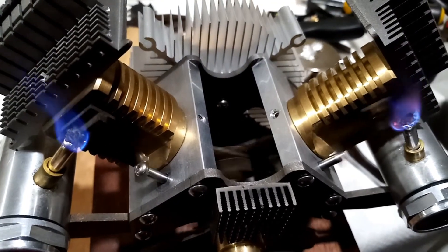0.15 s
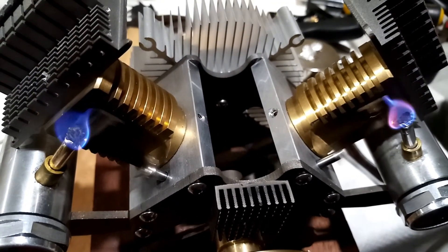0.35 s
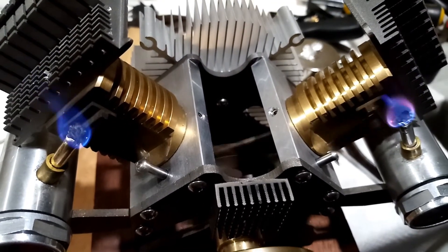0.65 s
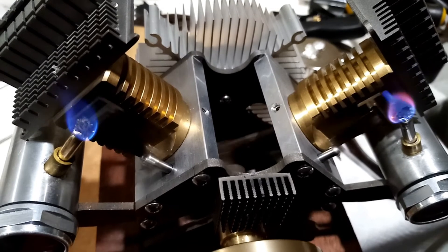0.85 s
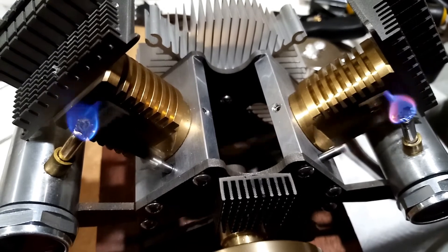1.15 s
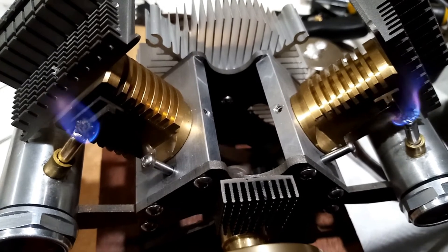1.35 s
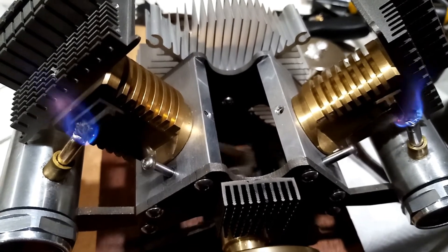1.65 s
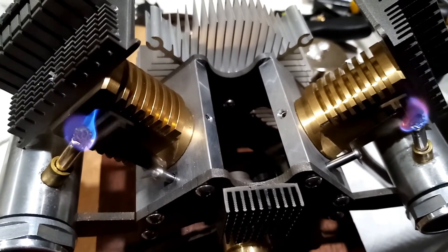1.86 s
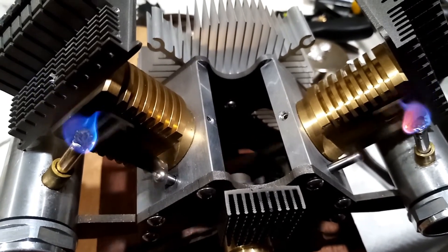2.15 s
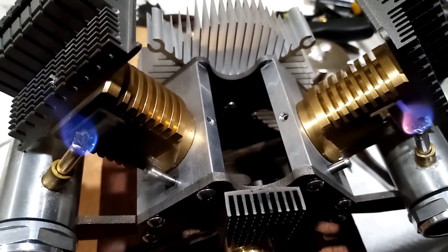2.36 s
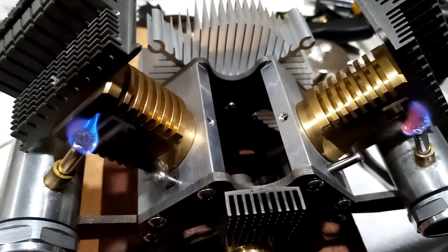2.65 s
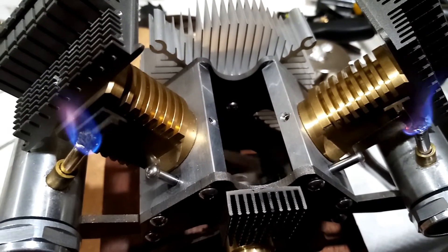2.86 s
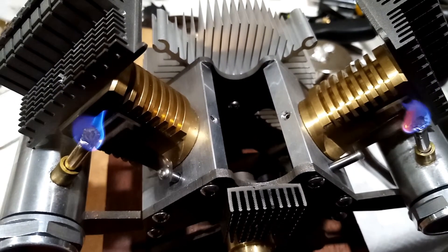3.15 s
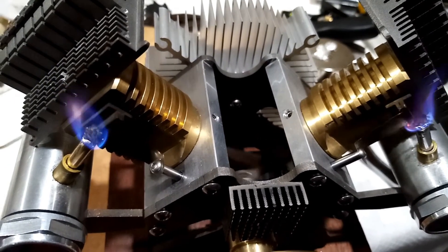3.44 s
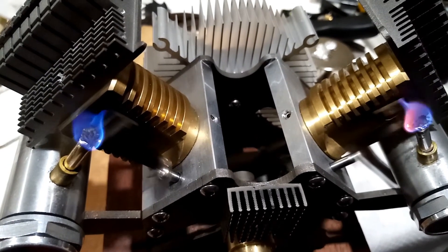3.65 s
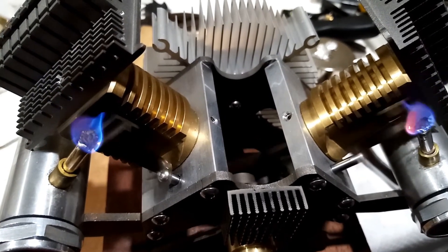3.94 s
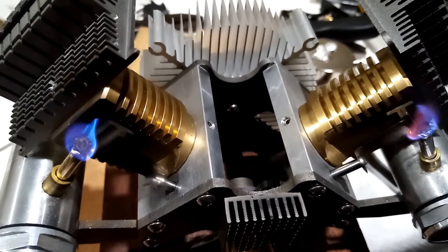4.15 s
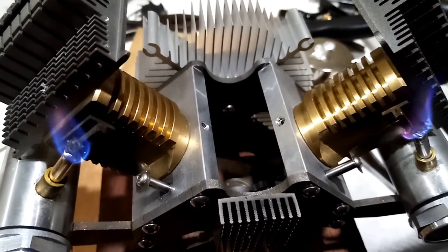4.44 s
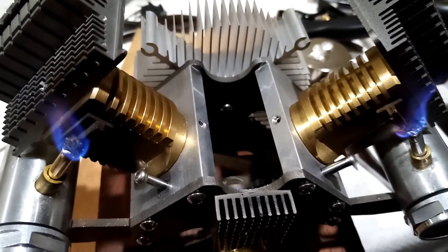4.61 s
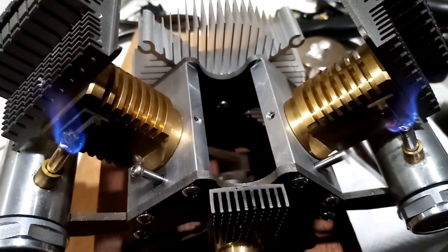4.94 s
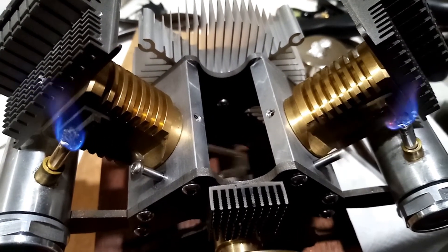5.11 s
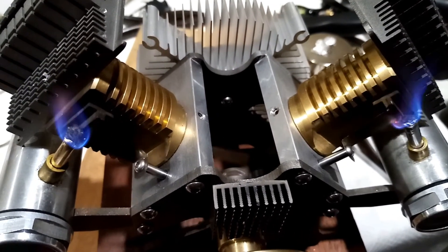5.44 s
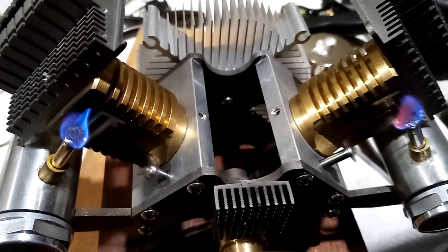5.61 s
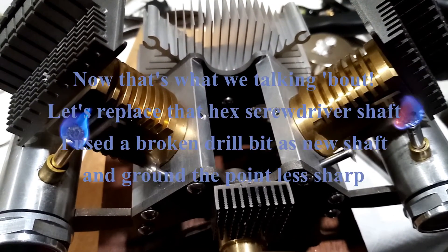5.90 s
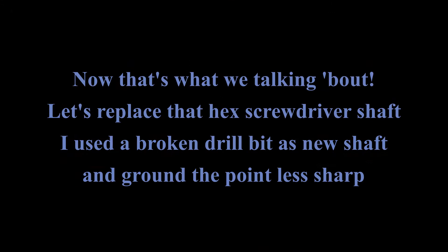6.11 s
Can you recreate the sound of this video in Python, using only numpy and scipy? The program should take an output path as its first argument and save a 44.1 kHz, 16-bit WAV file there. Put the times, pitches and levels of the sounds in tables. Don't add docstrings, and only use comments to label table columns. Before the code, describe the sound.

Close metallic ticking and clacking of a tiny flame-driven engine, soft popping gulps and steady hiss, ending in a sudden stuttered cut to silence.

```python
import sys
import numpy as np
from scipy import signal
from scipy.io import wavfile
from scipy.ndimage import uniform_filter1d

SR = 44100
rng = np.random.default_rng(int(sys.argv[2]) if len(sys.argv) > 2 else 0)


def generate_wav(sig):
    pcm = np.round(np.clip(np.atleast_2d(sig).T, -1, 1) * 32767).astype(np.int16)
    wavfile.write(sys.argv[1], SR, pcm)


def invert_db(x):
    u = np.asarray(x, float) / 20
    return 10 ** u


N = 276462
T = np.arange(N) / SR
TAPS = 2048
HZ = np.fft.rfftfreq(TAPS, 1 / SR)
PORT_LAG = 43
USUAL_SPEED, TURNS = 6.25, 37


def evened(x):
    return x / np.sqrt(np.mean(x ** 2, axis=-1, keepdims=True) + 1e-20)


def peaks(modes):
    return np.sqrt(sum(invert_db(2 * db) / (1 + (2 * (HZ - hz) / width) ** 2) ** 1.24 for hz, width, db in modes))


def colour(x, gain):
    log_gain = np.log(np.maximum(np.r_[gain, gain[-2:0:-1]], 1e-5))
    taps = np.fft.ifft(np.exp(np.conj(signal.hilbert(log_gain)))).real
    return signal.oaconvolve(x, taps / np.linalg.norm(taps))[:N]


def colour_ports(drive, gains):
    right = np.linalg.norm(gains[1])
    return np.array([colour(x, g) * np.linalg.norm(g) / right for x, g in zip(drive, gains)])


def after(events, shape):
    return signal.oaconvolve(events, shape)[:N]


def spikes(s, db):
    out = np.zeros(N)
    out[np.round(np.clip(s, 0, 6) * SR).astype(int)] = invert_db(db)
    return out


def pair(same, grain_db, per_s):
    grains = invert_db(grain_db * evened(uniform_filter1d(rng.standard_normal(N), int(SR / per_s))))
    a, b = evened(rng.standard_normal((2, N)) * grains)
    return np.array([a, same * np.roll(a, PORT_LAG) + np.sqrt(1 - same ** 2) * b])


def lagged(x):
    return np.array([x, np.roll(x, PORT_LAG)])


def pan(db):
    return invert_db(db * np.array([[.5], [-.5]]))


# (t/s, speed/turns per s)
SPEED = [(0, 6.775), (.13, 6.047), (.75, 6.624), (1.28, 6.581), (1.51, 6.346), (2.1, 6.248), (2.16, 6.034),
         (2.4, 6.195), (3.08, 6.285), (3.28, 6.178), (4.21, 6.388), (4.23, 6.18), (4.45, 6.295),
         (4.84, 6.011), (4.87, 6.168), (5.88, 6.327)]


def crank():
    speed = np.interp(T, *np.transpose(SPEED))
    return speed, -.187 + np.cumsum(speed) / SR


def once_a_turn(share):
    return np.interp(np.arange(TURNS) + share, crank()[1], T)


# (f/Hz, width/Hz, left level/dB, right level/dB)
FRAME = [(626.6, 86, -8.5, -1), (885, 86, -6, -11.5), (1144, 110, -6.5, 2), (1257, 50, 0, 2),
         (1541, 218, -5, 3.5), (1754, 144, 1, 4.5), (2220, 470, -2.5, -8.5)]


def frame(drive, low_db, deep_db):
    lift = invert_db(low_db * (abs(HZ - 1200) < 200) + deep_db * (HZ < 990))
    gains = [peaks([(hz, w, row[c]) for hz, w, *row in FRAME]) * lift for c in range(2)]
    return colour_ports(drive, gains)


# (f/Hz, width/Hz, level/dB)
PLATES = [(4150, 1300, 0.5), (6200, 200, -3.5), (6490, 780, 5), (7550, 900, -9.5)]
# (f/Hz, level/dB)
LEFT_PORT = [(700, -2), (2700, -3), (3300, -4), (5100, -1.5), (6400, -1.5), (7800, -10), (8800, -4),
             (9500, -13), (10200, -11.5), (11400, -15), (12200, -26), (13200, -22), (13900, -27),
             (14900, -12), (15500, -25)]
RIGHT_PORT = [(700, 1), (2500, -4.5), (3300, -0.5), (5100, -2.5), (6400, 0.5), (7300, -1.5), (8800, -1.5),
              (9500, 2), (10200, -19), (11400, -3), (12300, -12.5), (13300, -19.5), (13900, -12.5),
              (14600, 3.5), (15500, 4.5)]


def plates(drive, tilt_db, ring_db):
    ring = np.hypot(1, peaks(PLATES)) * invert_db(tilt_db * np.log2((HZ + 1) / 6000))
    ring = ring / np.hypot(1, (3400 / (HZ + 1)) ** 3)
    ring = ring * invert_db(ring_db / (1 + ((HZ - 4050) / 220) ** 2))
    gains = []
    for port in (LEFT_PORT, RIGHT_PORT):
        hz, db = np.transpose(port)
        gains.append(ring * invert_db(np.interp(np.log(HZ + 1), np.log(hz), db)))
    return colour_ports(drive, gains)


# (share of turn, frame level/dB, hiss level/dB, rumble level/dB)
SLIDE = [(0, -41, -35, -56.5), (.08, -46, -35.5, -51.5), (0.188, -49.5, -41.5, -51.5),
         (.255, -48, -38, -52), (.285, -46, -33.5, -54), (.32, -46, -36.5, -55.5), (.36, -44.5, -34, -56),
         (.41, -45, -36, -51), (.47, -46.5, -35.5, -50), (.52, -45, -36.5, -51), (.57, -47.5, -37.5, -52),
         (.62, -46, -36, -50.5), (.68, -46.5, -37, -47), (0.742, -44.5, -37, -49.5), (.84, -51, -42, -45.5),
         (0.909, -45, -41, -63), (0.942, -40, -35.5, -58), (1.0, -44, -30.5, -41.5)]
# (f/Hz, width/Hz, level/dB)
BENCH = [(122, 47, -4), (165, 67, -14.5), (202.6, 13, 2.5), (283.3, 31, -3), (392, 182, -8.5)]


def slide():
    speed, turns = crank()
    share, *columns = np.transpose(SLIDE)
    frame_db, hiss_db, rumble_db = (np.interp(turns % 1, share, c) for c in columns)
    hiss_db = hiss_db + 2.5 * (speed - USUAL_SPEED)
    rumble_db = rumble_db + 1.5 * (speed - USUAL_SPEED)
    rub = frame(lagged(invert_db(frame_db)) * pair(0.68, 1.3, 120), -0.13, 0.1)
    hiss = plates(lagged(invert_db(hiss_db + 4)) * pair(0.07, 1.5, 200), 0.2, 0.26)
    rumble = [colour(x, peaks(BENCH)) for x in lagged(invert_db(rumble_db)) * pair(0.9, 1.4, 86)]
    return rub + hiss + rumble * invert_db(np.array([[-3.0], [1.5]]))


# (f/Hz, width/Hz, level/dB)
BURNERS = [(2890, 1300, 0), (4580, 380, -3)]


def burners():
    away = (crank()[1] - 0.95 + .5) % 1 - .5
    flare = invert_db(-52 + 7.5 * np.exp(-.5 * (away / .05) ** 2))
    return np.array([colour(x, peaks(BURNERS)) for x in flare * pair(.2, 1.9, 300)])


# (t/s, pop level/dB, cavity ring level/dB, bench thud level/dB)
VACUUM = [(0, -34.5, -44, -43.5), (1.05, -33, -58.5, -39), (1.4, -35.5, -48, -49), (2.75, -35, -48, -38),
          (3.35, -37, -79.5, -43.5), (3.65, -35.5, -55, -41), (3.85, -39, -44, -46),
          (5.05, -37.5, -48.5, -46.5), (5.35, -46, -46, -62), (5.8, -36, -43, -42)]
# (t/s, pop level/dB)
BACK_POPS = [
    (0.4584, -40),
    (0.6117, -39),
    (2.4901, -36),
    (3.7732, -33),
    (4.2465, -43),
    (5.0979, -42),
    (5.3774, -35),
]


def gulps():
    s = once_a_turn(-.069)
    when, pop_db, ring_db, thud_db = np.transpose(VACUUM)
    back_s, back_db = np.transpose(BACK_POPS)
    wobble = rng.standard_normal((len(s), 4))
    pop_wobble_db = 1.2 * wobble[:, 2]
    pop_db = np.interp(s, when, pop_db) + pop_wobble_db
    thud_db = np.interp(s, when, thud_db) + pop_wobble_db
    ring_db = np.interp(s, when, ring_db) + 2.2 * wobble[:, 3]
    gulp = spikes(s, pop_db) + spikes(back_s, back_db)
    knock = spikes(s + .015 + .0002 * wobble[:, 0], -39.5 + 1.5 * wobble[:, 1])

    t = np.arange(0, .08, 1 / SR)
    rebound = .55 * np.exp(-.5 * ((t - .0036) / .0006) ** 2)
    suction = rebound - 1.25 * np.exp(-.5 * ((t - .002) / .00042) ** 2)
    thud = (t > .002) * invert_db(-60 * t / 0.14) * np.sin(2 * np.pi * 120 * (t - .0022))
    back_thud = (t > .002) * invert_db(-60 * t / 0.081) * np.sin(2 * np.pi * 203 * (t - .0022))
    ring = (1 - np.exp(-t / 0.0041)) * invert_db(-60 * t / 0.12) * np.sin(2 * np.pi * 385 * t)

    air = after(gulp + knock, suction) + after(spikes(s, thud_db), thud)
    air = air + after(spikes(back_s, back_db), back_thud)
    air = np.roll(air, -round(.002 * SR))
    cavity = after(spikes(s + .003, ring_db + 5.5), ring)
    return np.array([air + cavity, np.roll(invert_db(0.5) * air + invert_db(6.5) * cavity, PORT_LAG + 10)])


def rattle(hold, t60):
    t = np.arange(0, .07, 1 / SR)
    late = np.maximum(t - hold, 0)
    return np.minimum(t / .0004, 1) * (0.34 * np.exp(-late / 0.0014) + 0.45 * invert_db(-60 * late / t60))


def strike(rows, hold, t60, knock_pan_db, tick_pan_db, tilt_db, low_db, deep_db, ring_db):
    s, knock_db, tick_db = np.transpose(rows)
    shape = rattle(hold, t60)
    knock = lagged(after(spikes(s - .003, knock_db + 1.5), shape)) * pair(0.83, 0.48, 800)
    knock = knock + lagged(spikes(s - .0028, knock_db + 13))
    tick = lagged(after(spikes(s - .0027, tick_db + 4), shape)) * pair(0.35, 0.98, 1200)
    tick = tick + lagged(spikes(s - .0022, tick_db + 2))
    return frame(knock * pan(knock_pan_db), low_db, deep_db) + plates(tick * pan(tick_pan_db), tilt_db, ring_db)


def strike_rows(listed, share, scatter_s, knock_db, tick_db, scatter_db):
    rows = [0, knock_db, tick_db] + rng.standard_normal((TURNS, 3)) * [scatter_s, scatter_db, scatter_db]
    rows[:, 0] += once_a_turn(share)
    rows[abs(rows[:, :1] - np.transpose(listed)[0]).argmin(axis=0)] = listed
    return rows


# (share of turn, scatter/s, frame knock level/dB, valve tick level/dB, scatter/dB)
STRIKE_PLACE = [
    (0.001, 0.00031, -36.5, -32.5, 1.5),
    (.288, 0.0015, -54, -50, 18),
    (.357, .001, -40.5, -29, 0),
    (.567, 0.0012, -38.5, -27.5, 3),
    (.718, .0015, -56, -29.5, -0.5),
]
# (hold/s, rattle t60/s, knock L-R/dB, tick L-R/dB, tick tilt/dB per octave,
# low knock level/dB, deep knock level/dB, 4 kHz ring level/dB)
STRIKE_KIND = [
    (0.0029, 0.077, -0.5, -5.5, -1.5, -4.5, -0.5, 10),
    (0.004, 0.038, 0, 2, 3, -15.5, -7.5, 2.5),
    (0.0023, 0.069, -1.5, -2, 2, 1, -2.5, -6.5),
    (0.002, 0.077, 1, 1.5, 3, 6.5, 4.5, -2.5),
    (0.0004, 0.03, -6, -14, 8, 3, 6, 11.5),
]
# (t/s, frame knock level/dB, valve tick level/dB)
SHUTS = [(.1883, -35, -28.5), (.35, -37, -32.5), (.5091, -31, -33.5), (.6637, -33, -29),
         (1.118, -33.5, -27), (1.4219, -37.5, -28), (1.8966, -34, -28), (2.8631, -33.5, -30.5),
         (3.0236, -36.5, -29.5), (3.1839, -36, -30), (3.3436, -39, -38), (3.9817, -33.5, -36),
         (4.141, -33, -33), (4.299, -32, -34), (4.4587, -33.5, -27.5), (4.783, -35.5, -29),
         (4.9471, -35, -31), (5.1077, -47, -35), (5.2689, -31.5, -30.5), (5.7472, -36, -30.5),
         (0.028, -36.5, -36), (0.8156, -36, -30), (0.9648, -33, -35), (1.2696, -35, -32.5),
         (1.5817, -34, -30), (1.7358, -36, -32.5), (2.0556, -34, -31), (2.2188, -35, -34.5),
         (2.3808, -37, -32), (2.541, -33, -35), (2.7015, -39.5, -35), (3.5064, -36, -34),
         (3.6648, -35, -35), (3.8246, -34, -32), (4.6207, -32, -28.5), (5.4319, -38.5, -32),
         (5.5875, -38, -32.5)]
LIFTS = [(.5526, -51, -36.5), (0.7063, -39, -29), (.8558, -38, -48), (1.0075, -38.5, -32),
         (1.16, -36, -32), (1.3116, -39, -27.5), (1.469, -37, -25), (1.6224, -38, -30.5),
         (2.103, -50, -46), (2.267, -42.5, -26), (2.5905, -37.5, -62), (2.91, -38, -29),
         (3.069, -36, -34), (3.388, -39.5, -37), (3.551, -38, -31), (3.8703, -46, -27),
         (4.029, -35.5, -38), (4.185, -42, -26.5), (4.3453, -31, -26), (4.668, -36, -26),
         (5.634, -39, -26.5), (0.0751, -45, -32), (0.2347, -38, -22), (0.396, -39, -37),
         (1.7822, -41, -31), (1.9408, -46, -31.5), (2.4281, -43, -30), (2.7487, -38, -33),
         (3.2276, -38.5, -26), (3.7119, -39.5, -33), (4.5055, -37, -26), (4.8298, -39, -38),
         (4.9915, -43, -31), (5.1537, -40, -33), (5.3156, -48, -36), (5.4747, -40, -34)]
DROPS = [(.5644, -32.5, -24.5), (.7152, -36, -22.5), (.866, -59.5, -34), (1.0197, -40, -24.5),
         (1.1689, -35, -22.5), (2.1162, -37.5, -25), (2.2767, -38.5, -42), (2.9204, -31, -24.5),
         (3.3978, -50, -56), (3.5615, -44, -39), (3.7222, -36, -50), (3.8813, -34.5, -24.5),
         (4.1985, -39.5, -27), (4.3605, -41.5, -27), (4.5158, -40, -27), (5.004, -36, -28.5),
         (5.1647, -36.5, -39), (5.6495, -38.5, -27.5), (0.0834, -38, -29.5), (0.2444, -38, -30),
         (0.4058, -41, -29.5), (1.3215, -36.5, -23.5), (1.4771, -40.5, -24.5), (1.6343, -45.5, -26),
         (1.7915, -38, -23.5), (1.9523, -39.5, -24), (2.4388, -35, -30), (2.6005, -40, -24),
         (2.759, -34.5, -25.5), (3.079, -40.5, -27.5), (3.2384, -43, -30.5), (4.0375, -40, -22),
         (4.6767, -42, -28), (4.8397, -50, -27), (5.3271, -36.5, -32.5), (5.4872, -42, -29)]
SLACKS = [(0.2776, -41, -26), (.4397, -60, -52), (0.896, -35.5, -39), (1.2, -36.5, -28),
          (1.6656, -34.5, -25), (1.827, -36, -26), (1.9874, -48.5, -32), (2.6314, -36.5, -25),
          (2.7935, -38, -51), (3.4348, -44, -55), (3.756, -62.5, -30), (4.073, -34.5, -25.5),
          (4.2303, -34, -28.5), (4.389, -46.5, -25.5), (4.551, -39.5, -45), (4.876, -58, -42),
          (5.038, -43, -44), (0.1183, -39.5, -25.5), (0.594, -35.5, -26), (0.7454, -39, -25),
          (1.0483, -40, -25.5), (1.3551, -38.5, -26), (1.5104, -36, -26.5), (2.1479, -44.5, -27.5),
          (2.3106, -41.5, -27.5), (2.4723, -38, -26.5), (2.9511, -37, -24.5), (3.113, -36, -27),
          (3.2729, -34.5, -26.5), (3.5961, -38.5, -27), (3.9128, -40.5, -30), (4.7101, -34.5, -28.5),
          (5.1983, -41.5, -29), (5.3607, -40.5, -31.5), (5.5189, -40.5, -28.5), (5.6781, -40, -28)]
SPRINGS = [(.144, -55, -27), (.4633, -42, -40.5), (0.618, -49, -34.5), (.7703, -61, -62),
           (.9237, -47, -48), (1.539, -72, -26.5), (1.854, -60.5, -41), (2.1705, -64, -37),
           (2.335, -45, -44), (2.4946, -40, -27), (2.817, -53, -26), (2.977, -53.5, -28),
           (3.782, -35.5, -28), (5.386, -41, -36.5), (5.7052, -61, -28)]


def strikes():
    listed_strikes = (SHUTS, LIFTS, DROPS, SLACKS, SPRINGS)
    out = np.zeros((2, N))
    for listed, place, kind in zip(listed_strikes, STRIKE_PLACE, STRIKE_KIND):
        out += strike(strike_rows(listed, *place), *kind)
    return out


FIN_HZ = [409, 3526, 3576, 3816, 5305, 5960, 6725, 7348]
# (t60/s, level at valve shut/dB, at cam lift/dB, at rod slack/dB, L-R/dB)
FINS = [(0.2, -55.5, -71.5, -72, 0.5), (.5, -55, -64.5, -63.5, -16), (0.55, -53.5, -64.5, -64, 3.5),
        (.25, -58, -65.5, -67, 4.5), (.3, -59, -53.5, -60, -2.5), (.25, -52.5, -54, -53.5, 1.5),
        (.2, -56.5, -56.5, -58, 1), (0.36, -58, -54.5, -57.5, -4)]


def fins():
    out = np.zeros((2, N))
    places = [(once_a_turn(STRIKE_PLACE[kind][0]) * SR).astype(int) for kind in (0, 1, 3)]
    for hz, (t60, *levels_db, pan_db) in zip(FIN_HZ, FINS):
        kicks = np.zeros(N, complex)
        for at, db in zip(places, levels_db):
            strength = invert_db(db + 3.4 * rng.standard_normal(TURNS))
            kicks[at] = strength * np.exp(2j * np.pi * rng.random(TURNS))
        pole = invert_db(-60 / (t60 * SR)) * np.exp(2j * np.pi * hz / SR)
        out += lagged(signal.lfilter([1], [1, -pole], kicks).real) * pan(pan_db)
    return out


# (t/s, level/dB, L-R/dB)
LOOSE = [(0.2896, -27, -3), (0.426, -26, 2.5), (0.5, -22.5, -3), (0.5833, -26.5, -12.5),
         (1.011, -28.5, -10), (1.124, -39, -6), (1.2737, -27.5, 6), (1.2797, -26, -8), (1.501, -28.5, -13),
         (1.5201, -24.5, -4.5), (1.6795, -25.5, -14), (1.7401, -38, -8), (1.8433, -29, -13),
         (2.107, -33, -10), (2.285, -21.5, -6), (2.897, -25.5, -8.5), (3.065, -24, -8), (3.1243, -33, -11),
         (3.9887, -38.5, -10), (4.146, -27, -5), (4.3538, -27.5, 2.5), (4.461, -39.5, -5.5),
         (4.629, -34, 0), (5.3493, -42, 8), (5.3773, -27.5, 2), (5.435, -24.5, -9), (5.5325, -33, -6),
         (5.654, -25.5, -9), (5.6905, -28, -9)]


def loose():
    s, db, pan_db = np.transpose(LOOSE)
    shape = rattle(0.0045, 0.027)
    left = after(spikes(s - 0.0055, db + pan_db), shape)
    right = after(spikes(s - 0.0011, db), shape)
    return plates(np.array([left, right]) * pair(0.33, 2.0, 1200), 2.1, -1.5)


# (t/s, f/Hz, level/dB)
FLUTTER = [
    [(4.2, 115.7, -81), (4.245, 165, -41), (4.28, 130, -47), (4.31, 114, -41)],
    [(4.45, 128.9, -60), (4.5, 177, -41), (4.54, 141, -51), (4.58, 110, -81.5)],
]


def flutter():
    out = np.zeros(N)
    for gust in FLUTTER:
        s, hz, db = np.transpose(gust)
        inside = (T > s[0]) & (T < s[-1])
        tone = np.sin(2 * np.pi * np.cumsum(np.interp(T, s, hz)) / SR)
        out += inside * invert_db(np.interp(T, s, db) + 2) * tone
    return lagged(out)


def scene():
    return strikes() + loose() + slide() + fins() + burners() + gulps() + flutter()


# (f/Hz, left share, right share)
DROPPED = [(2000, 0, 0), (2700, .3, .36), (3100, .12, .14), (3350, .22, .22), (3550, .05, .05),
           (3700, .3, .3), (3900, .03, .03), (4900, .03, .03), (5150, .2, .25), (5300, .02, .02),
           (9800, .08, .02), (10300, .5, .85), (10700, .2, .05), (11800, .6, .12), (12500, .88, .5),
           (13300, .85, .93), (13800, .7, .5), (14100, .6, .03), (15000, .25, 0)]


def drop_weak_bands(x):
    lead, bins = 741, 8
    z = signal.stft(np.pad(x, ((0, 0), (lead, 0))), nperseg=TAPS)[2]
    start = np.arange(0, len(HZ), bins)
    band = np.add.reduceat(abs(z) ** 2, start, axis=1) + 1e-20
    margin = band / uniform_filter1d(band, size=15, axis=1) ** 0.98
    margin = margin / margin.mean(axis=2, keepdims=True)
    margin = margin + margin[::-1] * 0.38
    rank = margin.argsort(axis=2).argsort(axis=2) / margin.shape[2]
    hz, *shares = np.transpose(DROPPED)
    gain = [np.where(r < np.interp(HZ[start], hz, s)[:, None], .003, 1) for r, s in zip(rank, shares)]
    waver_db = 2.2 * rng.standard_normal(rank.shape) * (HZ[start] > 2200)[:, None]
    gain = np.repeat(gain * invert_db(waver_db), bins, axis=1)[:, :len(HZ)]
    return signal.istft(z * gain, nperseg=TAPS)[1][:, lead:lead + N]


def band_limit(x):
    return signal.sosfilt(signal.butter(12, 16890, fs=SR, output="sos"), x)


def record(dry):
    cut_s, repeat_s, end_s = 5.7925, 5.8073, 5.8342
    x = signal.sosfiltfilt(signal.butter(2, 100, "high", fs=SR, output="sos"), dry * np.minimum(T / 0.002, 1))
    x = x + invert_db(-78.5) * evened(signal.lfilter([1], [1, -.99], rng.standard_normal((2, N))))
    x = signal.oaconvolve(x, signal.firwin(511, 15620, window=("kaiser", 9), fs=SR)[None], "same")
    x = drop_weak_bands(x)
    scrap = np.roll(x, round((end_s - cut_s) * SR), axis=1)
    x = x * (T < cut_s) + scrap * (T > repeat_s) * (T < end_s)
    x = signal.oaconvolve(x, signal.firwin(63, 16200, fs=SR)[None], "same")
    return band_limit(x)


dry = scene()
out = record(dry)
generate_wav(out)
```